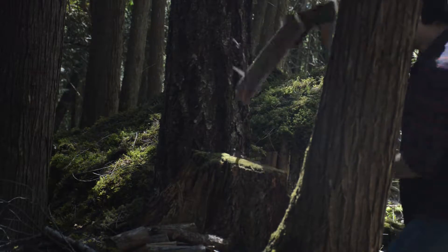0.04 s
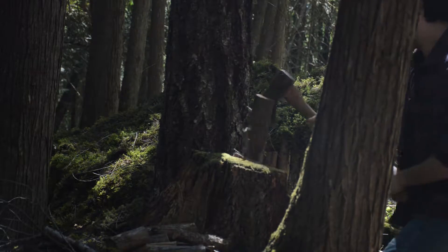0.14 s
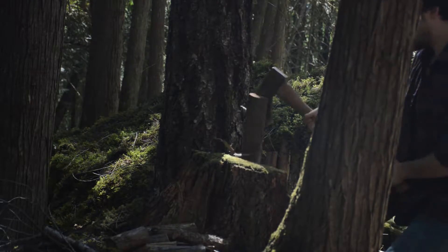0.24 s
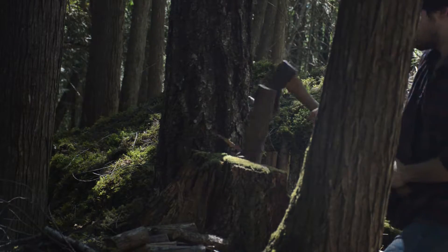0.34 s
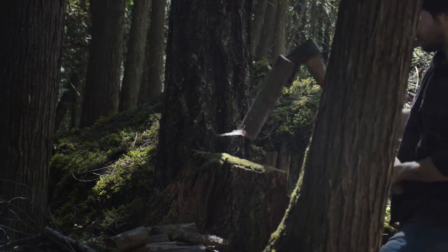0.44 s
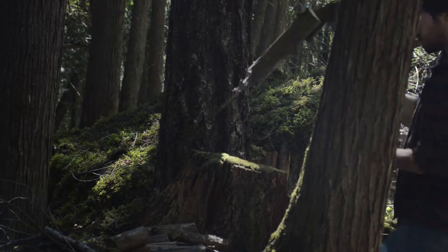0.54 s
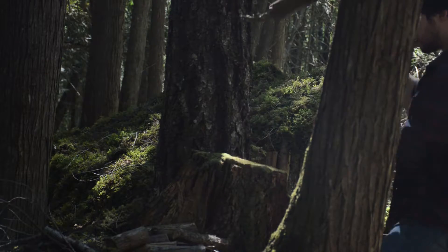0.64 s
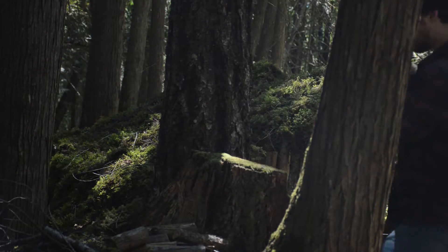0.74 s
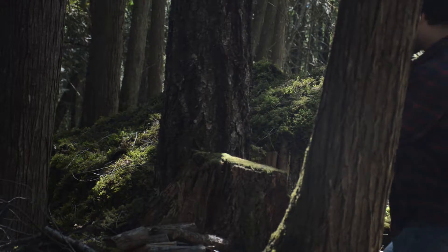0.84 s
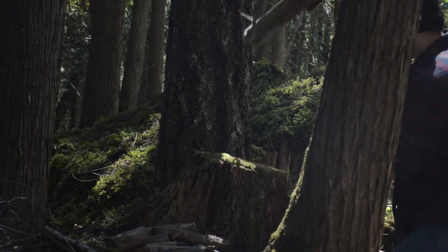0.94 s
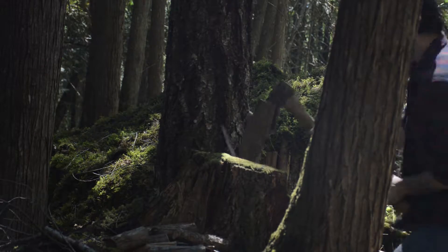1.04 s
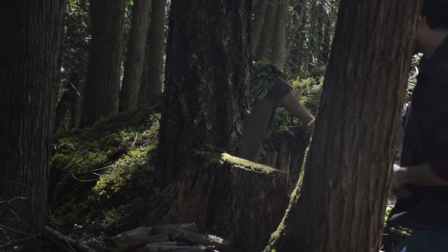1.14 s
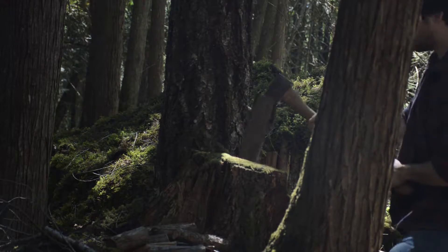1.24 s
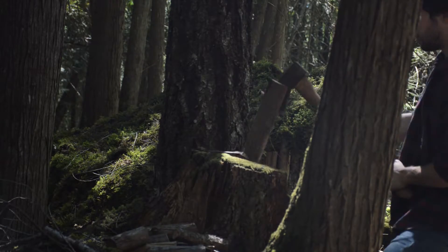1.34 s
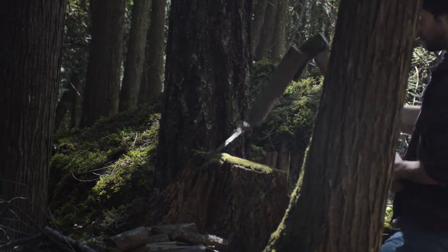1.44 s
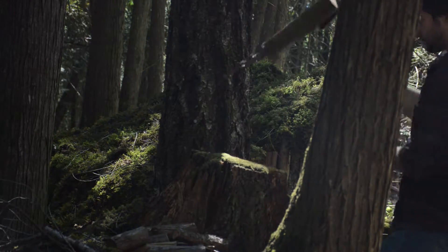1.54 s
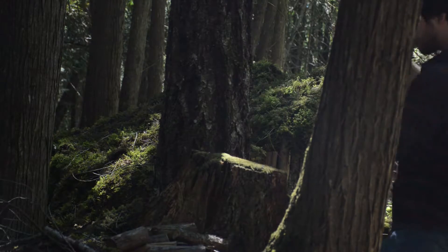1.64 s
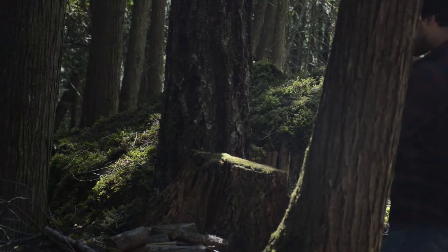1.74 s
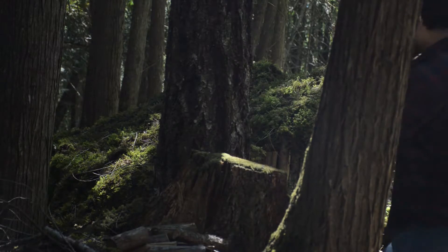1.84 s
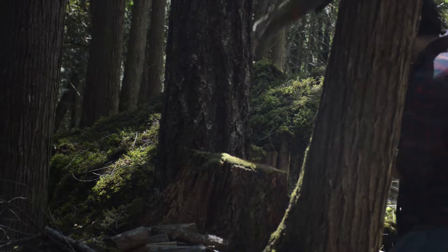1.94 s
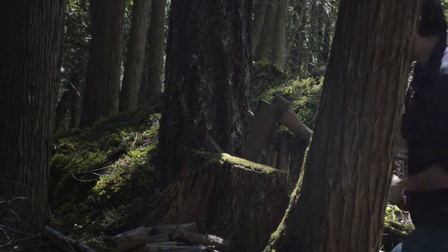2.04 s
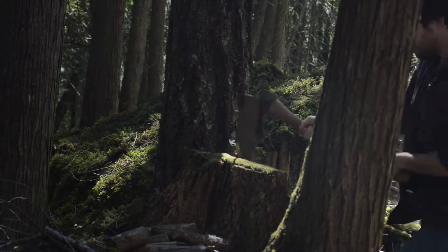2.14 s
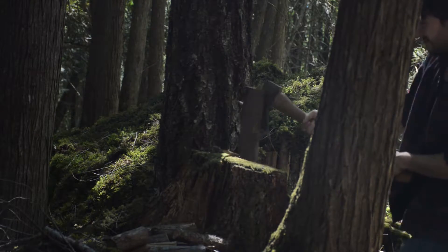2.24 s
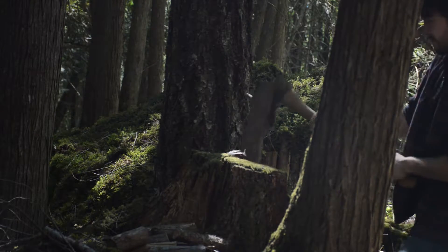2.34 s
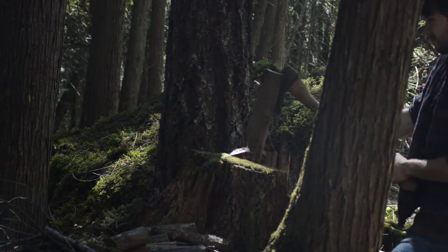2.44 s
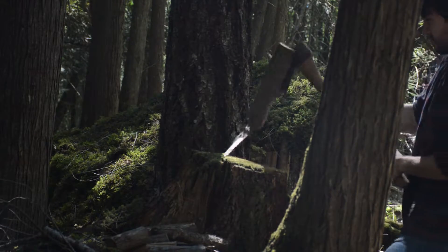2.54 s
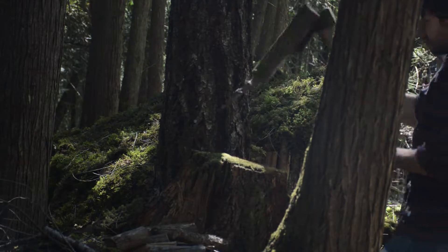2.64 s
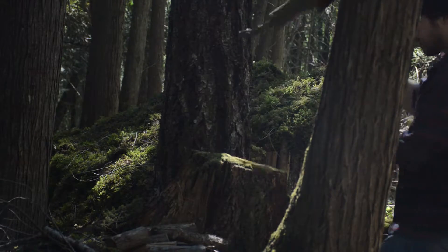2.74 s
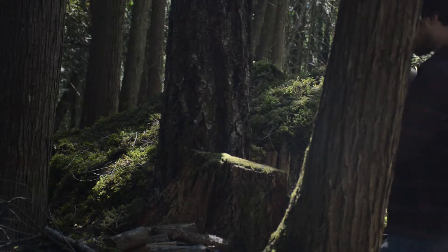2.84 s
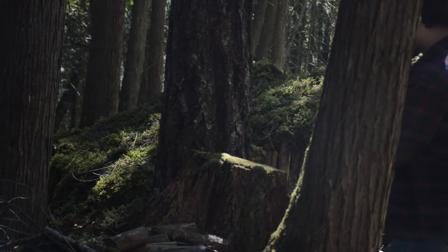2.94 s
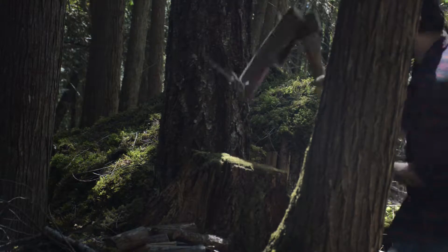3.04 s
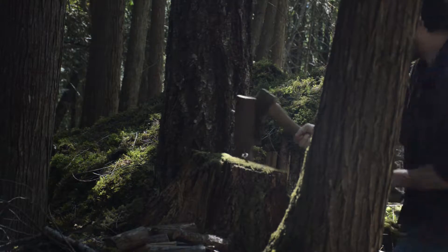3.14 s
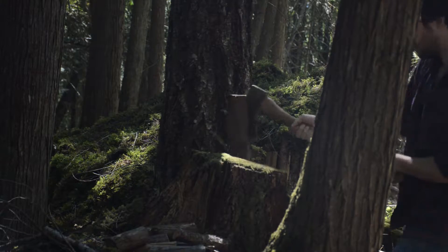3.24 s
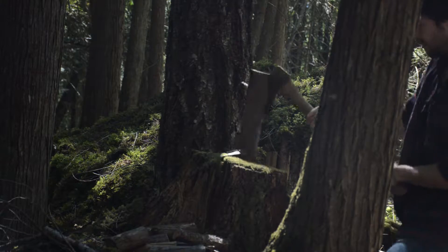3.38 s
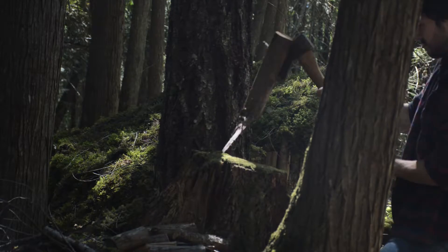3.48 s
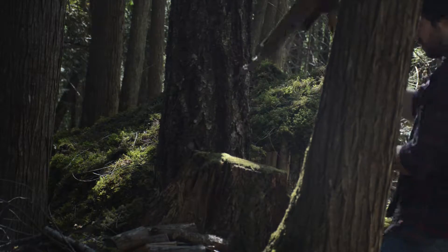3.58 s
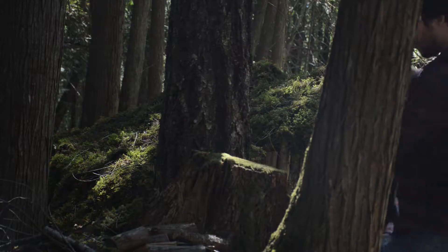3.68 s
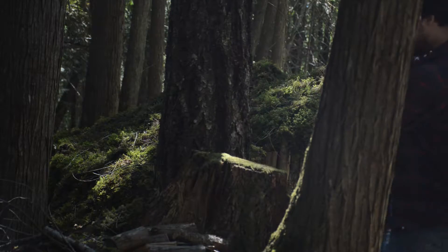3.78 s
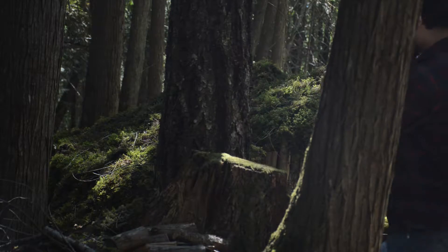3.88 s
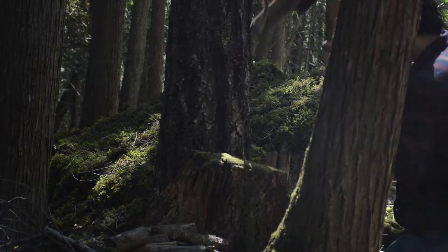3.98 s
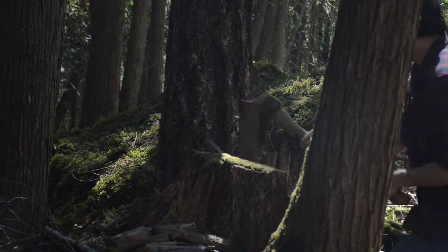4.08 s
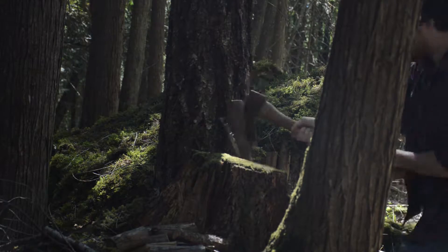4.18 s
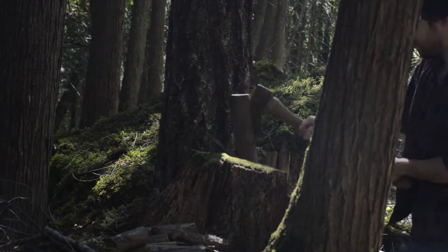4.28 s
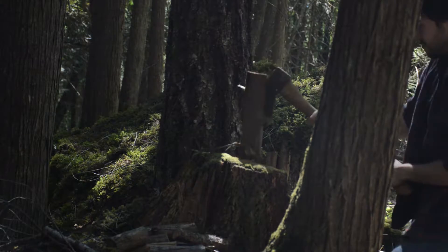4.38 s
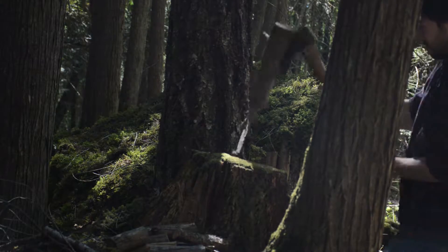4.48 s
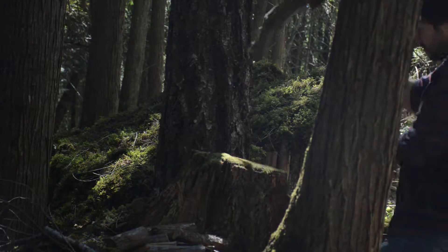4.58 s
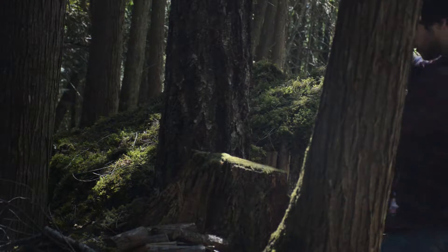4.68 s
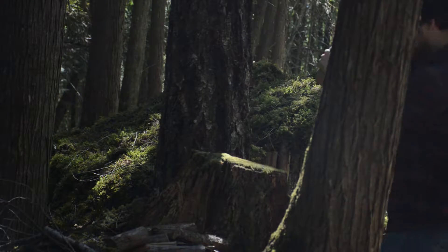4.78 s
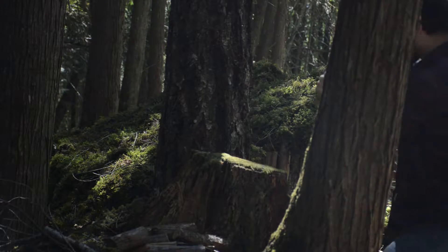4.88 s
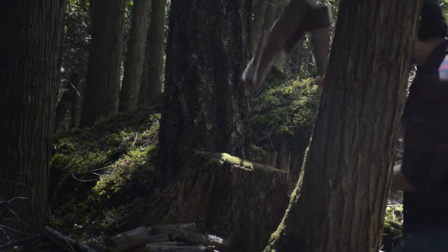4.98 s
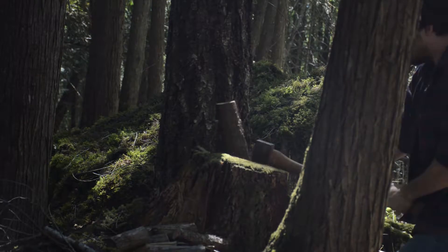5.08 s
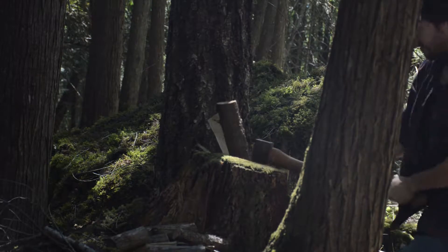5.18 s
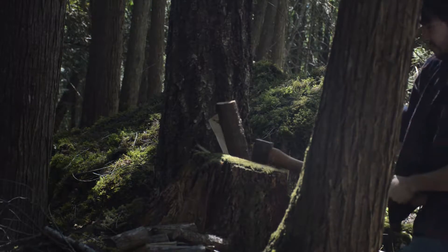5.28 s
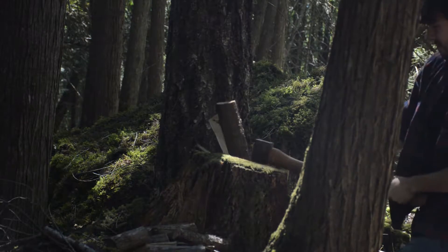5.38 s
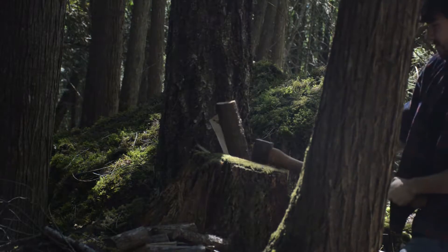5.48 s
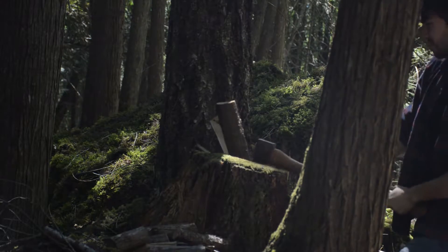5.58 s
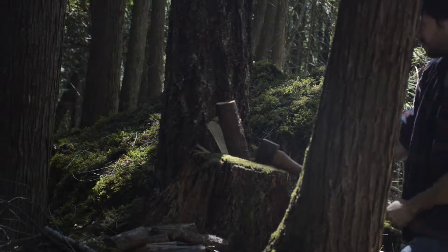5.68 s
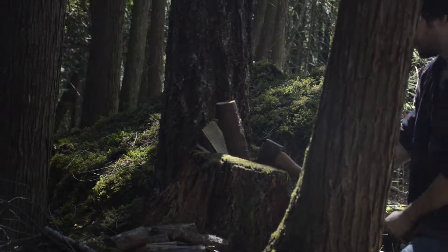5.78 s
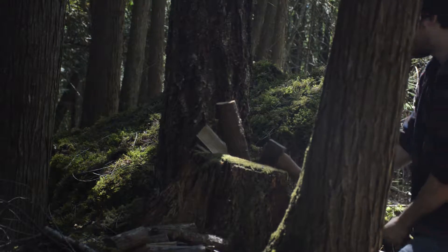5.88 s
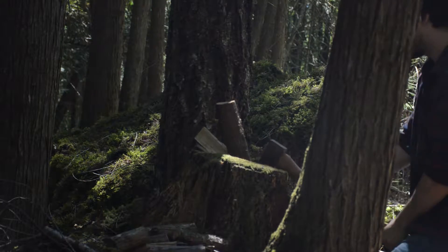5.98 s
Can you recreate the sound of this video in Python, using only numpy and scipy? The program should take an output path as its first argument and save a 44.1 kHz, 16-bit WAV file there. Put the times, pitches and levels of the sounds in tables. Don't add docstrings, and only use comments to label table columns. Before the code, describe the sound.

A quiet forest with a smooth, distant stream hiss and a barely audible low drone. At about 0.2 s a hatchet strikes a stump close to the microphone: a snapping crack, woody knock, strong short thud and diffuse echo from the trunks. A duller, softer chop follows at 1.1 s, with small ticks of chips around it. At 2.1 s comes the hardest, brightest crack, briefly overloaded, with the longest wash. From 2.55 to 3.3 s a far songbird gives slurred whistles, with a quick rising chirp at 2.9 s. Another sharp chop lands at 3.2 s, then an off-centre one at 4.1 s with a small metallic ring. Faint bird notes and ticks follow near 4.3 s. At 5.1 s the last blow splits the log with a crisp tearing crack and slight head ring; a dull tick at 5.4 s, then the echo fades into the hiss.

```python
import sys
import numpy as np
from scipy import signal
from scipy.fft import rfft, irfft
from scipy.io import wavfile
from scipy.ndimage import map_coordinates

SR = 44100
rng = np.random.default_rng(int(sys.argv[2]) if len(sys.argv) > 2 else 0)


def convert_level_to_amplitude(level_db):
    exponent = np.asarray(level_db, float) / 20
    return 10 ** exponent


def transcribe(signal):
    frames = np.atleast_2d(signal).T
    limited = np.clip(frames, -1, 1)
    pcm = np.round(limited * 32767).astype(np.int16)
    wavfile.write(sys.argv[1], SR, pcm)


N = 265466


def rms_one(x):
    return x / np.sqrt(np.mean(x ** 2) + 1e-20)


def at_hz(hz, points_hz, values):
    return np.interp(np.log(np.maximum(hz, 1)), np.log(points_hz), values)


def resonance(x, hz, width_hz):
    r = np.exp(-np.pi * width_hz / SR)
    feedback = [1, -2 * r * np.cos(2 * np.pi * hz / SR), r * r]
    return signal.lfilter([(1 - r * r) / 2, 0, (r * r - 1) / 2], feedback, x)


def ring(hz, t60, contact_s):
    t = np.arange(SR // 2) / SR
    return -np.sin(2 * np.pi * hz * t) * convert_level_to_amplitude(-60 * t / t60) * (1 - np.exp(-t / contact_s))


def add(out, s, sound):
    i = round(s * SR)
    out[i:i + len(sound)] += sound[:N - i]


def flutter(count, per_s):
    knots = rng.standard_normal(2000)
    return map_coordinates(knots, [np.arange(count) * per_s / SR], mode="wrap")


def echo_decay(t60, build_s):
    t = np.arange(SR) / SR
    decay = convert_level_to_amplitude(-60 * t / t60) * (1 - np.exp(-t / build_s))
    return decay / np.sqrt(np.sum(decay ** 2))


def far_echoes(x, t60, blur_s):
    echoes = signal.fftconvolve(x, echo_decay(t60, build_s=0.0034) * rng.standard_normal(SR))[:N]
    path_shift = blur_s * SR * flutter(N, per_s=150.0)
    return map_coordinates(echoes, [np.arange(N) + path_shift], mode="nearest")


# frequency in Hz, level in dB per Hz.
STREAM_COLOUR = [(18, -21), (42, -11.5), (70, -5), (130, -7), (300, -13.5), (500, -9.5), (800, -7.5),
                 (1700, -7.5), (3100, -10.5), (4500, -14.5), (7500, -22), (10000, -23), (12500, -33),
                 (16000, -33.5)]


def stream():
    colour = convert_level_to_amplitude(at_hz(np.arange(N // 2 + 1) * SR / N, *np.transpose(STREAM_COLOUR)))
    return convert_level_to_amplitude(-44.5) * rms_one(irfft(rfft(rng.standard_normal(N)) * colour, N))


# frequency in Hz, width in Hz, rms level in dB.
DRONE_TONES = [(101.6, 9.6, -60.5), (189.1, 16, -65.5)]


def drone():
    out = np.zeros(N)
    for hz, width_hz, level_db in DRONE_TONES:
        once = resonance(rng.standard_normal(N), hz, width_hz)
        out += convert_level_to_amplitude(level_db) * rms_one(resonance(once, hz, width_hz))
    return out


# start in seconds, push into the block in dB, hardness of the
# grain 0-2, lean of the knock to the treble in dB per octave, how far off centre 0-1.
BLOWS = [
    (0.1667, -8, 0.23, -1, 0.5),
    (1.0974, -10.5, 0.73, 0.5, 0.1),
    (2.0784, -4, 1.69, -.5, 0),
    (3.1667, -5, 1.5, 1.5, 0.34),
    (4.1169, -12, .8, -3.5, 1.05),
    (5.0929, -10.5, 2.02, 1.5, 0.1),
]


def by_blow(values):
    swing_s = 0.05
    starts = np.array(BLOWS)[1:, 0] - swing_s
    return np.asarray(values)[np.searchsorted(starts, np.arange(N) / SR)]


KNOCK_HZ, SNAP_HZ = 1300, 7000
# frequency in Hz, level in dB.
HARD_GRAIN = [(300, -1.6), (700, -1), (1500, -0.35), (2900, 8), (5000, 0.82)]
# frequency in Hz, level in dB.
OFF_CENTRE = [(500, -1.1), (950, 2.5), (1550, -1.5), (2060, 2.5), (3100, -2.5), (4010, 7), (5800, -0.3)]


def grain_db(hz):
    _, _, hardness, lean, off_centre = np.transpose(BLOWS)
    colour = hardness * at_hz(hz, *np.transpose(HARD_GRAIN))
    colour = colour + lean * np.clip(np.log2(hz / KNOCK_HZ), -1, 1)
    return by_blow(colour + off_centre * at_hz(hz, *np.transpose(OFF_CENTRE)))


# start in seconds,
# bright snap in dB, woody knock in dB, t60 in seconds.
CRACKS = [(0.149, -13.5, -38, 0.012), (0.163, -20, -23, 0.025), (0.1663, -14, -14, 0.018),
          (0.1715, -2.5, -25, 0.012), (0.1765, -27, -18.5, 0.042), (1.0979, -16.5, -10.5, .02),
          (1.1, -28, -15, 0.0097), (1.1053, -14.5, -30, 0.028), (1.1084, -12, -17, 0.011),
          (2.0787, -9, -16.5, 0.014), (2.082, -16, -26.5, .01), (2.0857, 6.5, -3, 0.01),
          (2.0889, 2, -1, 0.0064), (2.0917, -7, -3.5, 0.007), (2.095, -9, -20, 0.014),
          (2.0988, -14, -9.5, .015), (2.1192, -33, -17, .016), (3.163, -24, -24, 0.016),
          (3.1659, -8.5, -25, 0.0089), (3.168, -4.5, -25, 0.01), (3.1725, -25, -24, 0.025),
          (4.0739, -10, -37, 0.0097), (4.1176, -6, -7, 0.02), (4.1207, -1, -23, .013),
          (4.1235, -2.5, -10.5, 0.014), (4.143, -19, -15, .012),
          (5.0957, -5, -19, 0.01),
    (5.097, 3, -16.5, 0.013),
    (5.1002, -1, -15, 0.0077),
    (5.102, -17, -26, .018),
    (5.1062, -20, -28, .016),
    (5.112, -19, -22.5, 0.012),
    (5.123, -23, -26, 0.017),
]
# start in seconds, bright level in dB, dull level in dB.
TICKS = [(0.2983, -44, -38), (0.9666, -44, -53), (1.0596, -33, -55), (1.225, -39.5, -59),
         (1.5644, -45, -51), (1.5844, -43, -49), (1.6144, -48, -57), (2.0294, -32, -55),
         (3.033, -41.5, -52), (3.2784, -43, -56), (4.4, -43, -61), (4.4204, -40, -55), (4.459, -38, -60),
         (5.024, -44, -56), (5.0494, -45.5, -59), (5.435, -60, -32)]


def bursts():
    swell_share = 0.046
    tick = (0.001, 0.028)
    push = (0.0015, 0.031)
    tears = CRACKS
    bright = [(s, db, swell_share * t60, t60) for s, db, _, t60 in tears]
    bright += [(s, db, *tick) for s, db, _ in TICKS]
    woody = [(s, db, swell_share * t60, t60) for s, _, db, t60 in tears]
    woody += [(s, db - 18, *tick) for s, db, _ in TICKS]
    dull = [(s, db, *push) for s, db, *_ in BLOWS]
    dull += [(s, db, *tick) for s, _, db in TICKS]
    return bright, woody, dull


# frequency in Hz, width in Hz, level in dB.
BRIGHT_MODES = [(3990, 780, -9), (5690, 1360, 2), (8210, 1450, 5.5), (9440, 1210, 8), (10780, 3000, 1.5),
                (13800, 5500, -39)]
WOODY_MODES = [(650, 42, -6.5), (976, 140, 0), (1570, 273, -3), (1987, 120, -2.5), (3130, 2700, -15)]
DULL_MODES = [(256, 167, -3), (361, 93, 2.5), (518, 420, -6)]


def tearing(spread_db):
    t = np.arange(SR // 8) / SR
    out = np.zeros(N)
    for rows, modes in zip(bursts(), (BRIGHT_MODES, WOODY_MODES, DULL_MODES)):
        snaps = rng.standard_normal(N) * convert_level_to_amplitude(spread_db * np.minimum(rng.exponential(1, N), 4))
        force = np.zeros(N)
        for s, level_db, swell_s, t60 in rows:
            add(force, s, convert_level_to_amplitude(level_db - 60 * t / t60) * (1 - np.exp(-(t / swell_s) ** 2)))
        steady, torn = np.zeros(N), np.zeros(N)
        for k, (hz, width_hz, db) in enumerate(modes):
            sign = (-1) ** k
            steady += sign * convert_level_to_amplitude(db) * resonance(snaps, hz, width_hz)
            torn += sign * resonance(force * snaps * convert_level_to_amplitude(db + grain_db(hz)) + 1e-18, hz, width_hz)
        out += torn / np.std(steady)
    top_hz = 12770
    return signal.sosfilt(signal.butter(4, top_hz, fs=SR, output="sos"), out)


# start in seconds, handle level in dB, head level in dB.
RINGS = [
    (.168, -31, -50),
    (1.099, -39.5, -49),
    (2.087, -47, -37),
    (3.166, -43, -44),
    (4.118, -41, -24),
    (5.098, -40, -18),
]
# frequency in Hz, level in dB, t60 in seconds.
HANDLE_MODES = [(280, -4, .15), (455, -2, .3), (490, -2, .3), (570, -5, .25)]
HEAD_MODES = [(1972, -9, 0.043), (4190, 2, 0.011), (4320, -2, 0.014), (6500, -2, .01)]


def hatchet():
    handle, head = np.zeros(N), np.zeros(N)
    for s, handle_db, head_db in RINGS:
        for hz, db, t60 in HANDLE_MODES:
            add(handle, s, convert_level_to_amplitude(handle_db + db + rng.normal(0, 0.67)) * ring(hz, t60, contact_s=0.0017))
        for hz, db, t60 in HEAD_MODES:
            add(head, s, convert_level_to_amplitude(head_db + db + rng.normal(0, 0.67)) * ring(hz, t60, contact_s=0.0012))
    echoes = far_echoes(head + convert_level_to_amplitude(-9.0) * handle, t60=0.6, blur_s=0.00005)
    return handle + head + convert_level_to_amplitude(3.0) * echoes


# start in seconds, upper mode in Hz, upper mode in dB, lower mode in dB,
# roots and soil in dB.
THUDS = [
    (0.1691, 175, -2, -12.5, -38),
    (1.11, 152, -6.5, -15, -44),
    (2.1034, 164, -9.5, -20.5, -24),
    (3.1765, 135, -10.5, -10.5, -27),
    (4.131, 163, -4.5, -13, -21),
    (5.104, 170, -8.5, -13.5, -22.5),
]


def stump():
    out = np.zeros(N)
    for s, upper_hz, upper_db, lower_db, ground_db in THUDS:
        add(out, s, convert_level_to_amplitude(upper_db) * ring(upper_hz, t60=0.032, contact_s=0.00083))
        add(out, s, convert_level_to_amplitude(lower_db) * ring(100.5, t60=0.059, contact_s=0.003))
        add(out, s, convert_level_to_amplitude(ground_db) * ring(51, t60=0.21, contact_s=0.016))
    radiates_hz = 61
    return signal.sosfilt(signal.butter(3, radiates_hz, "high", fs=SR, output="sos"), out)


# frequency in Hz, level in dB, t60 in seconds.
TRUNKS = [(120, -14.5, 0.35), (262, -6, 0.13), (500, -18, 1), (1000, -8, 0.76), (2000, -7.5, 0.73),
          (4000, -13, 0.81), (8000, -16.5, 0.45), (11000, -15, 0.29), (16000, -61.5, .2)]
# knock in dB, snap in dB.
RETURNS = [
    (-2.5, -2),
    (-2.5, -2.5),
    (1.5, 2),
    (-3, -2),
    (-1.5, -1),
    (0.5, 0.5),
]


def forest(x):
    out, white = np.zeros(N), rng.standard_normal((2, N))
    table_hz, table_db, table_t60 = np.transpose(TRUNKS)
    edges = 60 * 2 ** np.arange(0, 8.6, 0.5)
    for k, (low, high) in enumerate(zip(edges, np.minimum(edges[1:], 0.45 * SR))):
        band = signal.butter(2, [low, high], "band", fs=SR, output="sos")
        hz = np.sqrt(low * high)
        return_db = by_blow([at_hz(hz, (KNOCK_HZ, SNAP_HZ), row) for row in RETURNS])
        gain = convert_level_to_amplitude(at_hz(hz, table_hz, table_db) + return_db)
        power = (signal.sosfilt(band, x) * gain) ** 2
        decay = echo_decay(at_hz(hz, table_hz, table_t60), build_s=0.0013)
        linger = signal.oaconvolve(power, decay ** 2)[:N]
        out += np.sqrt(np.maximum(linger, 0)) * rms_one(signal.sosfilt(band, white[k % 2]))
    return out


# start in seconds, length in seconds, from Hz, to Hz, level in dB.
SONG = [(2.552, 0.12, 2740, 2920, -46.5), (2.762, 0.041, 3380, 3170, -46), (2.78, 0.053, 2966, 2628, -41),
        (2.858, 0.021, 2450, 2340, -44), (2.884, 0.1, 2746, 2803, -41.5), (3.001, 0.07, 2955, 2750, -49.5),
        (3.18, .022, 3220, 3220, -40), (3.245, .035, 2224, 2420, -43), (3.292, .028, 2503, 2940, -42),
        (3.314, .028, 3010, 3080, -46), (4.258, 0.048, 3700, 4800, -49)]


def songbird():
    out = np.zeros(N)
    for s, length_s, from_hz, to_hz, level_db in SONG:
        along = np.linspace(-1, 1, int(length_s * SR))
        warble_hz = 30 + 650 * length_s
        pitch = from_hz + (to_hz - from_hz) * (along + 1) / 2
        pitch = pitch + warble_hz * flutter(len(along), per_s=160.0)
        flicker_db = 2.5 * flutter(len(along), per_s=103.0)
        gain = np.sqrt(2) * convert_level_to_amplitude(level_db - 4 * along ** 2 + flicker_db)
        whistle = np.sin(2 * np.pi * np.cumsum(pitch) / SR)
        add(out, s, gain * whistle * signal.windows.tukey(len(along), 0.4))
    return out


# start in seconds, length in seconds, from Hz, to Hz, level in dB.
CHIPS = [
    (2.918, 0.042, 4550, 6580, -40.5),
    (4.365, 0.0123, 6490, 4750, -38),
]


def chipping_bird():
    out = np.zeros(N)
    for s, length_s, from_hz, to_hz, level_db in CHIPS:
        hz = np.linspace(from_hz, to_hz, int(length_s * SR))
        whistle = np.sin(2 * np.pi * np.cumsum(hz) / SR)
        add(out, s, convert_level_to_amplitude(level_db) * whistle * signal.windows.tukey(len(hz), 0.6))
    return out


def scene():
    axe = tearing(spread_db=4.5) + stump()
    song, chips = songbird(), chipping_bird()
    bird_echoes = far_echoes(convert_level_to_amplitude(1.5) * song + convert_level_to_amplitude(-2.0) * chips, t60=0.65, blur_s=0.00016)
    birds = convert_level_to_amplitude(0.3) * song + chips + bird_echoes
    mix = axe + forest(axe + 1e-9) + hatchet() + birds + stream() + drone()
    return mix[None]


def top_cut(x):
    return signal.sosfilt(signal.butter(12, 16100, fs=SR, output="sos"), x)


def record(dry):
    ceiling = 1.2
    return top_cut(np.clip(dry, -ceiling, ceiling))


dry = scene()
out = record(dry)
transcribe(out)
```